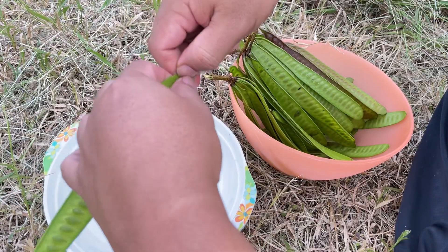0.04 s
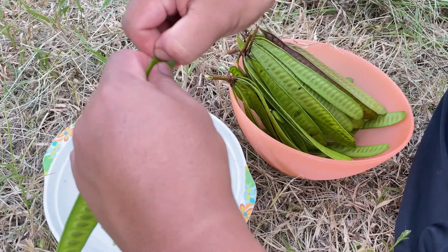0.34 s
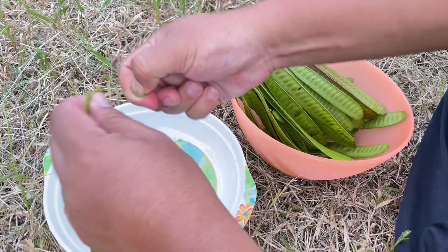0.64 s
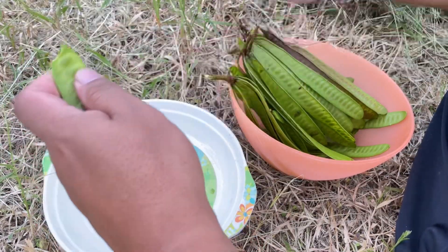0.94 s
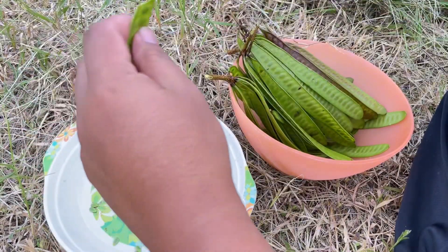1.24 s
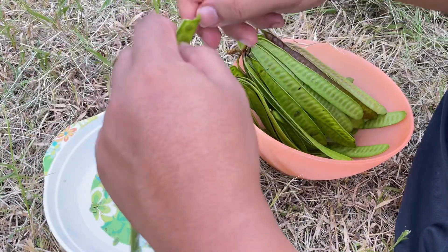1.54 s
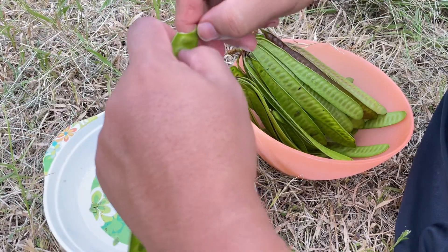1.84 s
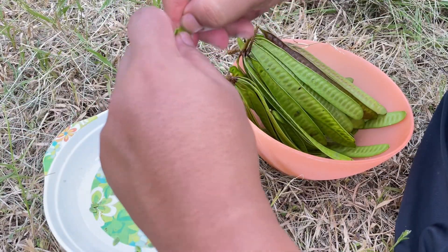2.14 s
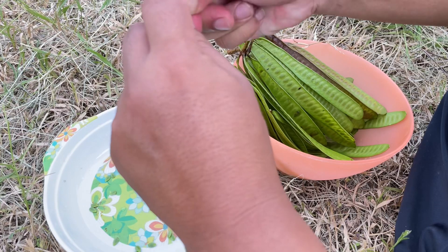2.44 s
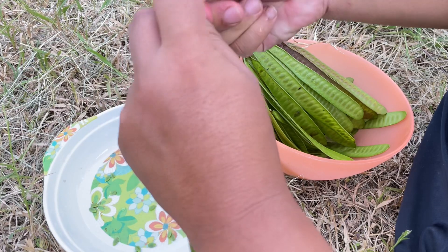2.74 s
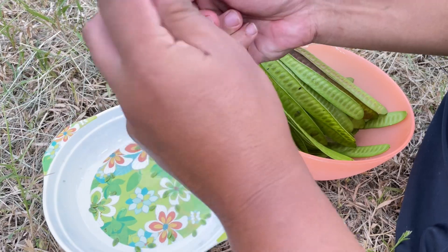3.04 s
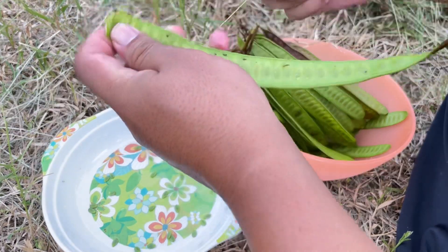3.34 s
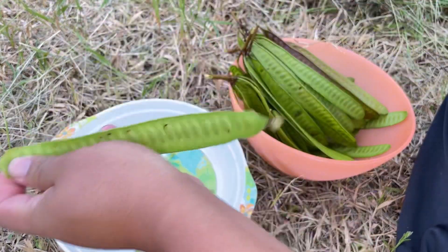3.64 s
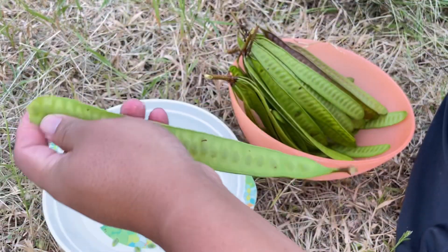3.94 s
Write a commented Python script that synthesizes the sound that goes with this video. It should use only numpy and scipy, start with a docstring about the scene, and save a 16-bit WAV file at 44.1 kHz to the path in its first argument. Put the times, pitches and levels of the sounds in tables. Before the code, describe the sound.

A green seed pod is snapped and torn open by hand close to the microphone: one crisp cluster of cracks, a pause, then a longer crackling run. Crickets, faint birds and a distant engine fill the field behind.

```python
"""On dry grass, a green seed pod is snapped and torn open by hand, close to the microphone.
Its fibres crack in short runs that make the pod ring, and fingers rub along its skin.
Crickets, a katydid and other insects sing all round by scraping their wings.
Birds call far off, and a distant engine swells over a low rumble of air."""
import sys
import numpy as np
from scipy import signal
from scipy.fft import rfft, irfft
from scipy.io import wavfile
from scipy.ndimage import uniform_filter1d

SR = 44100
rng = np.random.default_rng(int(sys.argv[2]) if len(sys.argv) > 2 else 0)


def master(y):
    """Save y as 16-bit WAV."""
    cut = np.clip(np.atleast_2d(y).T, -1, 1)
    pcm = np.round(cut * 32767)  # scale
    wavfile.write(sys.argv[1], SR, pcm.astype(np.int16))


N = 176400
T = np.arange(N) / SR
FREQS_HZ = np.fft.rfftfreq(N, 1 / SR)


def amp(db):
    """Turn decibels into a gain to multiply by."""
    return 10 ** (np.asarray(db) / 20)


def unit(x):
    """Scale a signal to an average (rms) level of 1."""
    return x / np.sqrt(np.mean(x ** 2) + 1e-20)


def curve(rows):
    """Join (time_s, value) points with straight lines."""
    return np.interp(T, *np.transpose(rows))


def pan(db):
    """Left and right gains; positive db makes the left louder."""
    return amp(np.array([[db], [-db]]) / 2)


def apart(x, lag_s):
    """Make a stereo pair whose right side is late."""
    return np.array([x, irfft(rfft(x) * np.exp(-2j * np.pi * FREQS_HZ * lag_s), N)])


def add(out, start_s, x):
    """Mix x into out, beginning at start_s."""
    first = max(int(round(start_s * SR)), 0)
    part = out[..., first:first + x.shape[-1]]
    part += x[..., :part.shape[-1]]


def drift(hz):
    """A random wander of size 1, mostly slower than hz."""
    return unit(irfft(rfft(rng.standard_normal(N)) / (1 + (FREQS_HZ / hz) ** 2), N))


def resonate(x, hz, width_hz):
    """Let x ring at one pitch."""
    r = np.exp(-np.pi * width_hz / SR)
    feedback = [1, -2 * r * np.cos(2 * np.pi * hz / SR), r * r]
    return signal.lfilter(np.array([1, 0, -1]) * (1 - r * r) / 2, feedback, x + 1e-18)


def colour(pair, spectrum):
    """Shape two unrelated signals into stereo sound of level 1 with the given spectrum."""
    # how alike left and right are: pitch_hz, likeness (0 to 1)
    likeness = [(60, 0.89), (130, 0.74), (280, 0.63), (600, 0.18), (1300, 0), (2500, 0.48), (5000, 0),
                (7000, 0), (10000, 0), (15000, 0.42)]
    db, alike = [np.interp(np.log(FREQS_HZ + 1), np.log(hz), values)
                 for hz, values in (np.transpose(spectrum), np.transpose(likeness))]
    mid, side = rfft(pair) * amp(db)
    return unit(irfft(np.sqrt(1 + alike) * mid + np.sqrt(1 - alike) * side * [[1], [-1]], N))


def noise(spectrum):
    """Steady stereo noise with the given spectrum."""
    return colour(rng.standard_normal((2, N)), spectrum)


def narrow(hz, width_hz):
    """Noise gathered round one pitch."""
    x = rng.standard_normal(N)
    for _ in range(3):
        x = resonate(x, hz, 2 * width_hz)
    return unit(x)


def burst(decay_s, channels=2):
    """A puff of noise that dies away, with a total energy of 1."""
    t = T[:int(7 * decay_s * SR) + 2]
    x = rng.standard_normal((channels, len(t))) * np.exp(-t / decay_s)
    return x / np.sqrt(np.sum(x ** 2, axis=1, keepdims=True))


def echoes(x, decay_s, db):
    """Many reflections of x blur into a fading tail."""
    return amp(db) * signal.fftconvolve(np.atleast_2d(x), burst(decay_s), axes=1)[:, :N]


def swell(start_s, length_s):
    """One smooth rise and fall."""
    return np.sin(np.pi * np.clip((T - start_s) / length_s, 0, 1))


def note(length_s, from_hz, to_hz, arch_hz=0):
    """A slightly rough whistle that glides straight or in an arch."""
    progress = np.linspace(0, 1, int(length_s * SR))
    arch = np.sin(np.pi * progress)
    hz = from_hz + (to_hz - from_hz) * progress + arch_hz * arch
    rough = unit(uniform_filter1d(rng.standard_normal(len(progress)), size=40))
    return np.abs(arch) ** 0.63 * np.sin(2 * np.pi * np.cumsum(hz * (1 + .008 * rough)) / SR)


def engine():
    """A far engine hums at wavering multiples of its firing rate, over road rumble."""
    # how fast it fires: time_s, rate_hz
    firing = [(0, 34), (1, 33), (2, 32.5), (2.8, 32.5), (3.4, 34), (4, 32.5)]
    # its overall loudness: time_s, level_db
    loudness = [(0.0, -47), (0.41, -48.5), (1.56, -48), (2.15, -41.5), (2.17, -44.5), (2.68, -39),
                (3.24, -41.5), (3.25, -39), (4.0, -41)]
    # the tones in the hum: multiple, level_db
    tones = [(2, -15), (3, -5.5), (4, -6.5), (5, -9.5), (6, -15.5), (7, -26), (8, -21.5)]
    # the road rumble's spectrum: pitch_hz, level_db
    rumble = [(28, -44), (50, -13), (90, -2.5), (140, 4.5), (190, -4), (240, -20), (280, -8.5),
              (350, -18.5), (500, -22), (800, -36.5), (2000, -74)]
    phase = 2 * np.pi * np.cumsum(curve(firing) * (1 + 0.01851 * drift(4.063))) / SR
    hum = 0
    for multiple, db in tones:
        waver = amp(4.5 * drift(2.7))
        hum += amp(db) * unit(waver * np.sin(multiple * phase + rng.uniform(0, 2 * np.pi)))
    return amp(curve(loudness)) * (hum + amp(-4.5) * noise(rumble))


def wind():
    """Moving air makes a low, steady rumble."""
    # the wind's spectrum: pitch_hz, level_db
    spectrum = [(20, -20), (35, -10), (50, 2), (66, 5.5), (85, -7.5), (180, -6.5), (300, -16.5), (600, -43),
                (1500, -80)]
    return amp(-50) * noise(spectrum)


def open_air():
    """A soft rush of air swells a little under a steady high hiss."""
    # the rush's spectrum: pitch_hz, level_db
    rush = [(200, -1), (500, -1), (800, 4), (1150, 6), (1600, -2), (2500, -4.5), (3800, -14), (4700, -6.5),
            (5700, -22), (6500, -2.5), (8300, -11), (9300, -84), (12000, -40)]
    # the rush's loudness: time_s, level_db
    loudness = [(0, -63), (1.2, -62), (2, -63), (2.8, -60.5), (3.4, -58.5), (4, -62)]
    # the hiss's spectrum: pitch_hz, level_db
    hiss = [(6000, -11), (8400, -13), (9300, -60), (10100, -11), (10500, 4), (11600, 4.5), (12400, -7),
            (13200, -11), (14000, 9), (14900, 4.5), (15700, 5), (16100, -31)]
    return amp(curve(loudness)) * noise(rush) + amp(-69) * noise(hiss)


def insect_choirs():
    """Many insects trill together, each kind on its own pitch."""
    # kinds of insect: pitch_hz, width_hz, level_db, pulse_hz, pulse_depth, pan_db, trend_db_per_s
    kinds = [(6955, 254, -57, 64, 0.3, -3, 0.56), (7275, 283, -61, 29, 0.31, -2.5, -0.6)]
    out = 0
    for hz, width_hz, db, pulse_hz, depth, pan_db, trend in kinds:
        phase = 2 * np.pi * np.cumsum(pulse_hz * (1 + 0.103 * drift(5.33))) / SR
        throb = 1 + depth * np.sin(phase)
        level = amp(db + trend * (T - T.mean()) + 0.12 * drift(.67))
        trill = level * unit(throb * narrow(hz, width_hz))
        out += pan(pan_db) * apart(trill, lag_s=.00003)
    return out


def churring_insect():
    """A far, lower-pitched insect swells and fades about once a second."""
    # its churrs: start_s, length_s, level_db
    churrs = [(0, 0.42, -74), (1.01, 0.57, -73), (1.946, 0.53, -74), (2.92, 0.52, -73)]
    level = sum(amp(db) * swell(start_s, length_s) for start_s, length_s, db in churrs)
    return level * narrow(hz=4950, width_hz=380)


def katydid(buzz_s=0.34, swell_db=10.5, strokes_per_s=146):
    """Fast, raspy wing strokes make buzzes that swell and stop short."""
    # when each buzz stops: end_s
    buzz_ends = [.105, 1.36, 2.035, 2.63, 3.345, 4.02]
    level = 0
    for end_s in buzz_ends:
        to_go = (end_s - T) / buzz_s
        level += (to_go > 0) * (to_go < 1) * amp(-swell_db * np.clip(to_go, 0, 1) ** 2)
    stroke = 2 * np.pi * strokes_per_s * T
    hz = 11600 - 160 * np.sin(stroke) + 112.3 * drift(200)
    wing = (1 + 0.95 * np.cos(stroke)) * np.sin(2 * np.pi * np.cumsum(hz) / SR)
    rasp = amp(-5.5) * (1 + np.sin(stroke)) * narrow(hz=11270, width_hz=540)
    return amp(-63.5) * uniform_filter1d(level, size=400) * (unit(wing) + rasp)


def cricket(pitch_hz=7757, chirp_s=0.037, spacing_s=0.045):
    """A cricket's wings make pairs of chirps, each rising and falling in pitch."""
    # when each pair begins: start_s
    pair_starts = [.004, 0.208, 0.749, 0.95, 1.407, 1.609, 1.81, 2.014, 2.213, 2.418, 2.623, 2.827, 3.028,
                   3.23, 3.434, 3.638, 3.839]
    song = np.zeros(N)
    for start_s in pair_starts:
        for delay_s in (0, spacing_s):
            gain = amp(-47.5 + rng.normal(0, 1))
            from_hz, to_hz = rng.normal(pitch_hz, 42, 2)
            add(song, start_s + delay_s, gain * note(chirp_s, from_hz, to_hz, arch_hz=292))
    return pan(-2) * (apart(song, lag_s=.00005) + echoes(song, decay_s=.02, db=-9))


def birds():
    """One hoarse call, whistles and a slowing trill, blurred by distance."""
    # whistled notes: start_s, length_s, from_hz, to_hz, level_db
    whistles = [(0.131, 0.068, 1620, 1320, -66), (0.749, 0.078, 1680, 1370, -67),
                (0.914, 0.078, 1950, 1310, -62), (1.119, 0.06, 1320, 1480, -61.5),
                (1.173, 0.057, 1760, 1530, -58.5), (3.66, 0.023, 5700, 4800, -74),
                (3.693, 0.027, 5700, 4800, -66), (3.732, 0.0265, 5600, 4700, -65),
                (3.86, 0.023, 5700, 4660, -71.5), (3.884, 0.029, 5700, 4670, -65),
                (3.92, 0.03, 5600, 4700, -63)]
    # the trill's notes: start_s, level_db
    trill = [(.492, -64), (.526, -64.5), (.56, -61), (.603, -60), (.63, -57.5), (.662, -58.5),
             (.695, -59.5), (.737, -67), (.785, -61.5), (.843, -62.5), (.893, -65), (.943, -64),
             (.996, -62), (1.053, -66), (1.108, -65.5)]
    calls = amp(-68) * swell(start_s=0.023, length_s=.15) * narrow(hz=3600, width_hz=440)  # hoarse call
    for start_s, length_s, from_hz, to_hz, db in whistles:
        add(calls, start_s, amp(db) * note(length_s, from_hz, to_hz))
    for start_s, db in trill:
        add(calls, start_s, amp(db) * note(length_s=0.0248, from_hz=3580, to_hz=3312))
    return calls + echoes(calls, decay_s=.055, db=0)


def pod_rubs(clicks_per_s=2500, spread_db=3):
    """The pod's tearing skin and the sliding fingers give off crowds of tiny clicks."""
    # tears and rubs: start_s, length_s, level_db
    rubs = [(.34, 0.042, -62.5), (0.452, 0.038, -46.5), (0.47, 0.11, -60), (1.125, 0.05, -67),
            (2.284, 0.05, -62), (2.61, 0.06, -53), (2.931, 0.042, -48), (2.966, 0.024, -48),
            (3.493, 0.085, -61.5)]
    # their spectrum: pitch_hz, level_db
    spectrum = [(800, -8), (2900, 0), (4500, -4), (7000, 5), (8700, -16), (10500, 3), (13000, -8),
                (15200, 8), (17000, -18)]
    clicks = (rng.random((2, N)) < clicks_per_s / SR) * rng.choice([-1, 1], (2, N))
    strength = amp(spread_db * np.minimum(rng.exponential(1, (2, N)), 4))
    level = sum(amp(db) * swell(start_s, length_s) for start_s, length_s, db in rubs)
    return level * colour(clicks * strength, spectrum)


def pod_cracks(snap_s=.0002):
    """Each fibre breaks with a tiny snap that scatters off the hands and makes the pod ring."""
    # fibre breaks: start_s, level_db, body_db (to 5 kHz), bite_db (near 10 kHz), edge_db (near 15 kHz)
    breaks = [(0.4087, -34.5, -1, 2, 15), (0.4273, 2, 3.5, -3.5, 1), (0.432, -11, -4, -8, -5),
              (.4321, -24, -12, -3, 1), (0.4479, -6.5, 7, -3, 2), (0.4669, -17.5, -5, 6, 1),
              (0.4739, -17.5, -4, 11, 13.5), (0.538, -34, -6, 9, 0), (0.582, -24, 3.5, 4, 2),
              (1.146, -33, -3, 5, 3), (1.64, -39, -5, 3, 0), (2.3187, -26.5, -14, 8, 12),
              (2.3259, -24.5, -2.5, 6.5, 0), (2.571, -3, -32, 6, 6), (2.615, -7, -6.5, 5.5, 7),
              (2.6191, -19, 1, 9, 2), (2.6257, -13.5, 1.5, 8.5, 7), (2.6625, -31.5, 2, -5, -2),
              (2.7247, -25.5, 3, 2, -0.5), (2.737, -31, 3, -1, -1), (2.751, -21, 5, 3.5, 8),
              (2.759, -19.5, -2.5, -11, -3), (2.829, -29.5, 1, -2, 0), (2.9152, -21.5, -1, 7, 7),
              (2.9354, -17.5, -2, 6.5, -5), (2.946, -12, -15, -3, -10), (2.953, -22, -3, -1, 1),
              (2.9675, -18, 3, -3, 3), (2.976, -17, -9, -4, 0), (2.9767, -13, -1, -10, -2),
              (2.9782, -18, -1, -5, -4), (2.982, -18, -7, -4, 0), (2.9925, -4.5, -12, 13, 6),
              (2.997, -14, 5.5, -8, -7), (3.005, -18.5, 6, 4, -3), (3.547, -27, -4, -23, -8)]
    # the pod's ringing tones: pitch_hz, width_hz, level_db, left_lead_s, pan_db
    tones = [(1140, 230, -19.5, -.00003, -7), (2690, 370, -4, .000066, 6), (3480, 440, -8, .000025, 2),
             (4290, 420, -1.5, .000056, 3.5), (4960, 300, -5, .000067, 7.5), (6330, 330, -0.5, .000046, -2),
             (7090, 630, 4, .000035, -4), (8380, 560, -2, .000057, 2.5), (10150, 720, -3, .000084, -3),
             (11130, 700, -6, .0001, 4), (14400, 550, -4, -0.0044, 3), (15070, 590, -0.5, -0.0083, 0)]
    kicks = np.zeros((len(tones), 2, N))  # what sets each tone ringing, left and right
    for start_s, db, body_db, bite_db, edge_db in breaks:
        snap = burst(snap_s, channels=1)[0]
        snap = irfft(np.exp(1j * np.angle(rfft(snap, 2 * len(snap)))))  # equal energy at every pitch
        scatter = amp(-3) * burst(decay_s=0.0021)
        jitter_s = rng.normal(0, .000015)
        spectrum = np.transpose([(1100, 2.52 * body_db), (2600, body_db), (5000, body_db), (6200, 0),
                                 (7500, 0), (10000, bite_db), (11500, bite_db), (14000, edge_db)])
        for kick, (hz, _, _, lead_s, _) in zip(kicks, tones):
            gain = amp(2.5 + db + np.interp(hz, *spectrum))
            add(kick[0], start_s - lead_s - jitter_s, gain * snap)
            add(kick[1], start_s, gain * snap)
            add(kick, start_s + snap_s, gain * scatter)
    ring = sum(amp(db) * pan(pan_db) * resonate(kick, hz, width_hz)
               for kick, (hz, width_hz, db, _, pan_db) in zip(kicks, tones))
    return ring + echoes(ring, decay_s=0.021, db=-23.5)


def scene():
    """The pod in front, the field behind."""
    bass = pan(2) * (engine() + wind())
    pod = pod_cracks() + pod_rubs()
    insects = cricket() + katydid() + insect_choirs() + churring_insect()
    return bass + pod + insects + birds() + open_air()


def record(dry, stop_hz=17400):
    """Cut away the very highest treble steeply."""
    return signal.sosfilt(signal.cheby2(16, 70, stop_hz, fs=SR, output="sos"), dry)


dry = scene()
out = record(dry)
master(out)
```